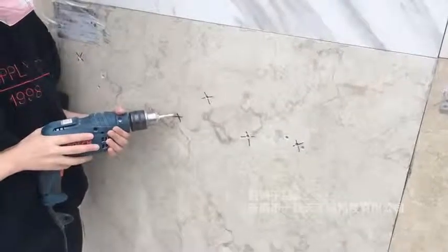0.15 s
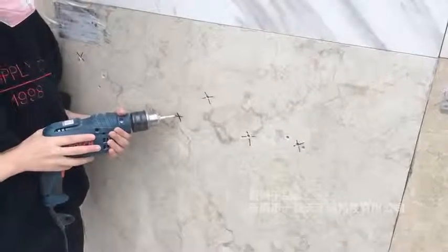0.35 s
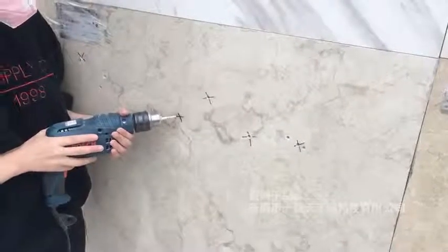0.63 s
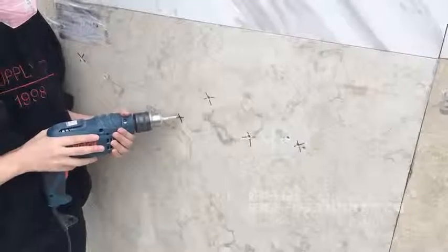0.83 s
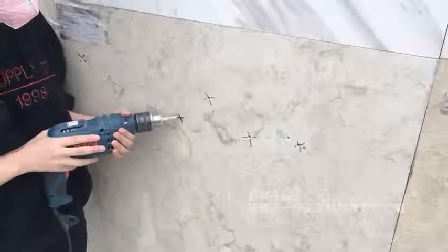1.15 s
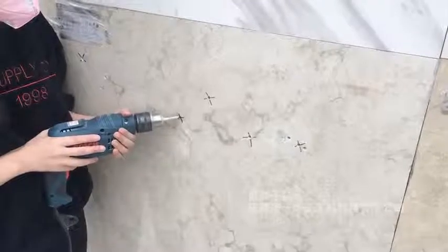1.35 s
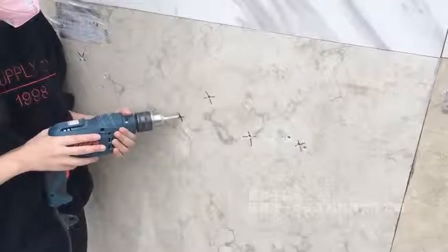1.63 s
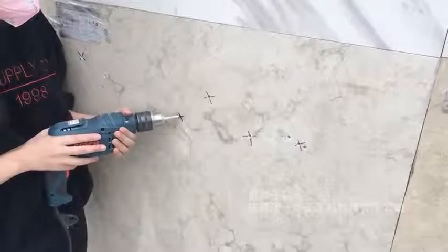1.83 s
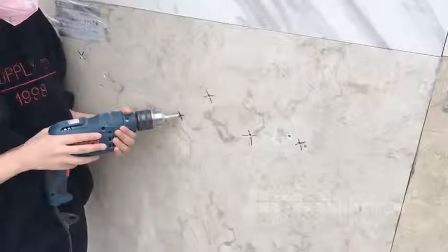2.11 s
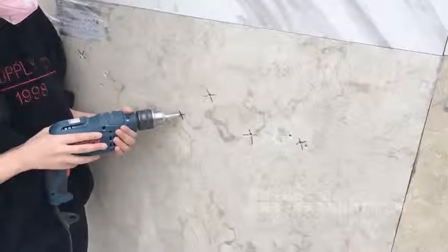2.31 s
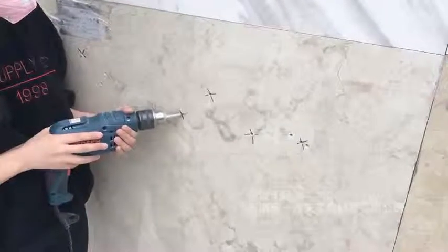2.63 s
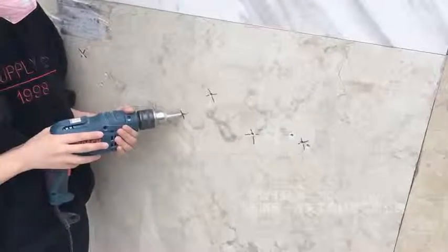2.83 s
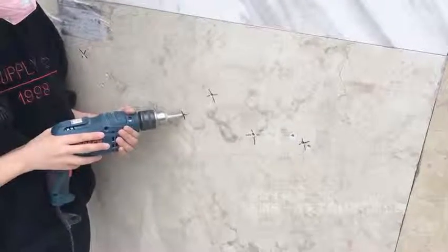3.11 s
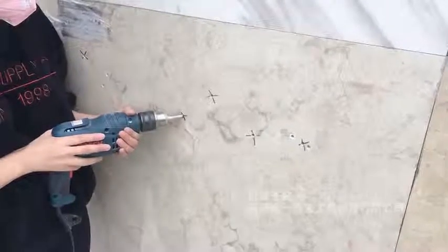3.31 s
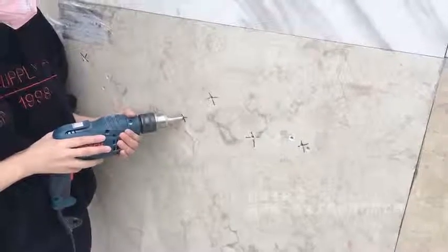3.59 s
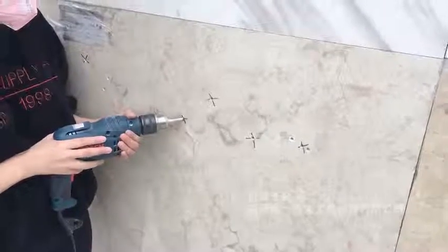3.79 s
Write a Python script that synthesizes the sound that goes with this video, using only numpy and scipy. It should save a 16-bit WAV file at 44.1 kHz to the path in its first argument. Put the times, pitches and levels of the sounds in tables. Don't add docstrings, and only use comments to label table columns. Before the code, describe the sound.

A corded electric drill runs nonstop at full speed on a glazed tile, a dense hissy, gritty whir with faint hum, outdoors close to a phone microphone, with low wind bumps.

```python
import sys
import numpy as np
from scipy import signal
from scipy.fft import rfft, irfft, next_fast_len
from scipy.io import wavfile
from scipy.ndimage import uniform_filter1d, minimum_filter1d

SR = 44100
rng = np.random.default_rng(int(sys.argv[2]) if len(sys.argv) > 2 else 0)


def to_linear_factor(level_db):
    exponent = np.asarray(level_db, float) / 20
    return 10 ** exponent


def bounce(signal):
    frames = np.transpose(np.atleast_2d(signal))
    limited = np.clip(frames, -1, 1)
    pcm = np.round(limited * 32767).astype(np.int16)
    wavfile.write(sys.argv[1], SR, pcm)


N = 174195


def unit(x):
    return x / np.sqrt(np.mean(x ** 2))


def walk(rate):
    hold = int(SR / rate)
    steps = np.repeat(rng.standard_normal(N // hold + 1), hold)
    smooth = uniform_filter1d(uniform_filter1d(steps, hold), hold)
    return unit(smooth[:N])


def flutter():
    quick = walk(60)
    return quick - uniform_filter1d(quick, size=5000)


def read_curve(points, hz):
    f, value = np.array(points).T
    return np.interp(np.log(hz + 1), np.log(f), value)


def breeze(t):
    # t/s, level/dB
    strength = [
        (0, -61),
        (.4, -55.5),
        (.75, -54),
        (.87, -68),
        (1.1, -34.5),
        (1.5, -55),
        (2.25, -56),
        (2.6, -51),
        (3, -53.5),
        (3.95, -51.5),
    ]
    centre_hz, width_hz, swing_db = 65, 40, -1
    noise = rfft(rng.standard_normal(N))
    hz = np.fft.rfftfreq(N, 1 / SR) + 1
    offset = (hz - centre_hz ** 2 / hz) / width_hz
    rumble = unit(irfft(noise / (1 + offset ** 2), N))
    return rumble * to_linear_factor(np.interp(t, *np.array(strength).T) + swing_db * walk(7.86))


def gusts(t):
    # t/s, level/dB, f/Hz, length/s, slap level/dB
    gust_list = [(.512, -37, 147, 0.0067, -15), (.615, -39.5, 110, 0.013, -5),
                 (0.652, -45, 80, 0.0091, 3.5), (0.735, -41, 95, 0.0049, -9),
                 (1.012, -25.5, 76, 0.0068, -4), (1.058, -40, 55, .02, -9), (1.08, -42, 65, .012, -7),
                 (1.128, -27.5, 79, 0.014, -11), (1.186, -40, 55, 0.033, -5),
                 (1.253, -22.5, 69.5, 0.0052, -3), (1.297, -32, 56, .018, -6),
                 (1.401, -43, 67.6, 0.025, -12), (1.556, -47, 50, 0.039, -15), (1.698, -57, 60, .012, -9),
                 (1.847, -41, 62, 0.013, -20), (1.975, -42, 61, 0.02, -9), (2.355, -28, 62.4, .016, -1.5),
                 (2.415, -41, 65, .02, -2), (2.496, -47, 60, 0.017, -11), (2.645, -37, 71, 0.0099, -15),
                 (2.695, -29.5, 64, 0.013, -10), (2.757, -41, 50, 0.016, -4),
                 (2.846, -51, 59.3, 0.0099, -23), (.93, -44, 70, .012, -9)]
    attack_share, slap_lead, slap_share = 0.89, 0.2, .55
    slap_ratio, slap_spread = 2.1, .15
    out = np.zeros(N)
    for start, db, f, length, slap_db in gust_list:
        swing_phase, slap_phase, chance = rng.random(3)
        near = np.abs(t - start) < .15
        d = t[near] - start

        rise = np.exp(-1.5 * d / length / attack_share)
        fall = np.exp(1.25 * d / length)
        swing_turns = f * d * (1 - 4 * d) + swing_phase
        swing = 2 / (rise + fall) * np.cos(2 * np.pi * swing_turns)

        slap_hz = slap_ratio * (1 + slap_spread * (2 * chance - 1)) * f
        bump = np.exp(-.5 * ((d / length + slap_lead) / slap_share) ** 2)
        slap = bump * np.cos(2 * np.pi * (slap_hz * d + slap_phase))
        out[near] += to_linear_factor(db) * (swing + to_linear_factor(slap_db) * slap)
    return out


def armature_hum(level_db):
    turns = np.cumsum(472 * (1 + .006 * walk(8))) / SR
    return np.sin(2 * np.pi * turns) * to_linear_factor(level_db - 27 + 2 * walk(6))


def grit_and_air():
    chips_per_s, scatter_db, grit_db = 12000, 1.2, -5
    hit = rng.random(N) < chips_per_s / SR
    direction = np.sign(rng.random(N) - .5)
    size = to_linear_factor(-scatter_db * np.log(rng.random(N) + 1e-9))
    return rng.standard_normal(N) + to_linear_factor(grit_db) * unit(hit * direction * size)


def housing_and_tile(hz):
    # f/Hz, level/dB per Hz
    colour = [(200, -19), (500, -19), (1000, -15), (2300, -12.5), (4800, -13), (7600, -17), (10400, -19),
              (14300, -17)]
    # f/Hz, width/Hz, lift/dB
    resonances = [(611, 54, 5.5), (940, 82, 3), (1390, 593, 7.5), (1590, 72, 5.5), (1791, 403, 9),
                  (2850, 43, 3), (3090, 810, 6.5), (3693, 220, 3.5), (4320, 570, 3), (5370, 270, 2.5),
                  (6540, 980, 7), (8880, 1730, 4), (11370, 390, 3), (12800, 1900, 6)]
    ripple_db, ripple_hz, top_hz = 1.1, 35, 14280
    db = read_curve(colour, hz)
    for f, width_hz, lift_db in resonances:
        db = db + lift_db / (1 + (2 * (hz - f) / width_hz) ** 2)
    ripple = uniform_filter1d(rng.standard_normal(len(hz)), int(ripple_hz / hz[1]))
    db = db + ripple_db * unit(ripple)
    low_cut = (hz / 150) ** 2 / (1 + (hz / 150) ** 2)
    return unit(to_linear_factor(db) * low_cut * (hz < top_hz))


def side_patches(f):
    # f/Hz, share of the time (0-1)
    dropout = [(4000, .72), (5200, .45), (6300, .3), (7600, .18), (9000, .1), (14000, .12)]
    length, start = 1024, 275
    patch = (np.arange(N) - start) // length + 1
    on = 1. * (rng.random(N // length + 2) > read_curve(dropout, f))[patch]
    on = uniform_filter1d(minimum_filter1d(on, size=1300), size=128)
    return on * to_linear_factor(2 * walk(31.17))


def drill(t):
    # t/s, level/dB, brightness/dB per octave, tile ring/dB, bit squeal/dB
    pressure = [(0, -25.5, -0.5, -3, -2), (.2, -28.5, -1, -2, 0), (.5, -29.5, -.5, -3, -0.5),
                (.85, -29, -0.57, -1.5, -0.5), (1.2, -28, -.7, 1.5, -1), (1.4, -26.5, 0, 0, -1.5),
                (1.75, -26, -0.5, -0.5, -1.5), (2.1, -25, 0, 0, -1), (2.35, -24.5, 0, 1, 0.5),
                (2.6, -23.5, -0.2, -1.5, 0), (2.9, -23, -0.1, 0.5, 1), (3.12, -23, -0.1, -0.5, 1),
                (3.35, -24.5, -0.5, 0, 2.5), (3.6, -25.5, -1.1, 0, 4), (3.8, -26.5, -0.7, 3, 3),
                (3.95, -25.5, -0.5, -1.5, 1)]
    # f/Hz, level/dB against the centre sound
    ear_difference = [(3500, -17.5), (6000, -8), (8000, -3), (14000, -4)]
    ring_hz, squeal_hz, peak_octaves = 1650, 3100, .25
    flutter_db, shared_db, flutter_rise = 1.2, .15, .45
    times, *columns = np.array(pressure).T
    level_db, bright_db, ring_db, squeal_db = (np.interp(t, times, col) for col in columns)

    n = next_fast_len(N)
    hz = np.fft.rfftfreq(n, 1 / SR)
    gain = housing_and_tile(hz)
    mid = rfft(grit_and_air(), n) * gain
    side = rfft(rng.standard_normal(n)) * gain * to_linear_factor(read_curve(ear_difference, hz))

    place = 6 * np.log2(1 + hz / 1500)
    shared = flutter()
    centre, width = np.zeros(N), np.zeros(N)
    for c in range(22):
        f = 1500 * (2 ** (c / 6) - 1) + 50
        octave = np.log2(f / 3000)
        swing_db = (flutter_db * flutter() + shared_db * shared) * 2 ** (flutter_rise * octave)
        ring = ring_db * np.exp(-(np.log2(f / ring_hz) / peak_octaves) ** 2)
        squeal = squeal_db * np.exp(-(np.log2(f / squeal_hz) / peak_octaves) ** 2)
        loudness = to_linear_factor(level_db + bright_db * octave + swing_db + ring + squeal)

        band = np.cos(np.pi / 2 * np.clip(place - c, -1, 1)) ** 2
        centre += irfft(mid * band, n)[:N] * loudness
        if f > 3900:
            side_band = irfft(side * (np.abs(place - c) < .5), n)[:N]
            width += side_band * loudness * side_patches(f)
    return centre + armature_hum(level_db), width


def scene():
    t = np.arange(N) / SR
    mid, side = drill(t)
    mid = mid + breeze(t) + gusts(t)
    return np.array([mid + side, mid - side])


def top_cut(x):
    return signal.sosfilt(signal.butter(12, 15520, fs=SR, output="sos"), x)


def record(dry):
    return top_cut(dry)


dry = scene()
out = record(dry)
bounce(out)
```